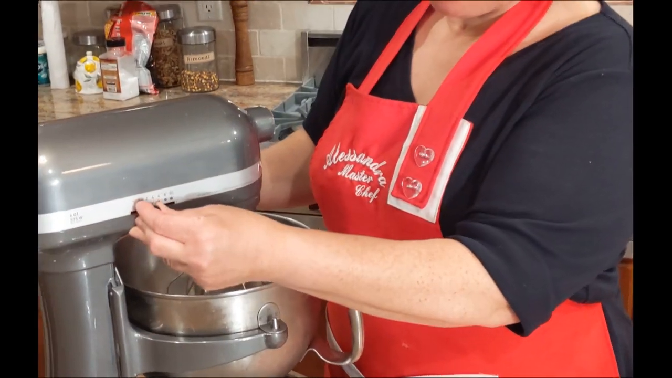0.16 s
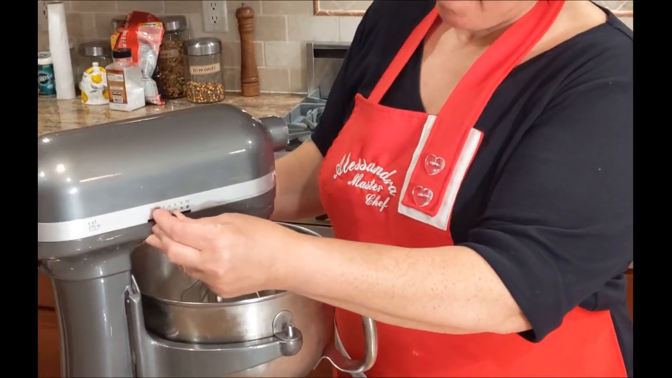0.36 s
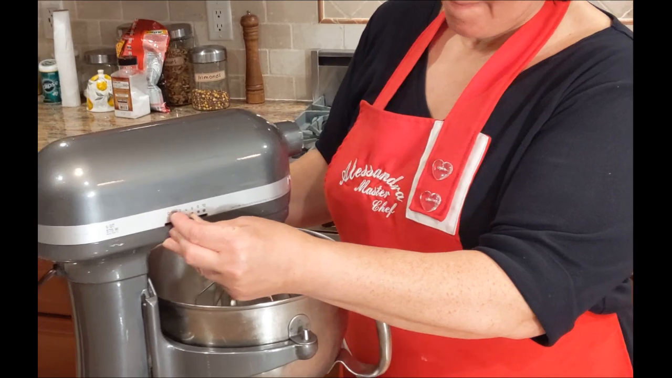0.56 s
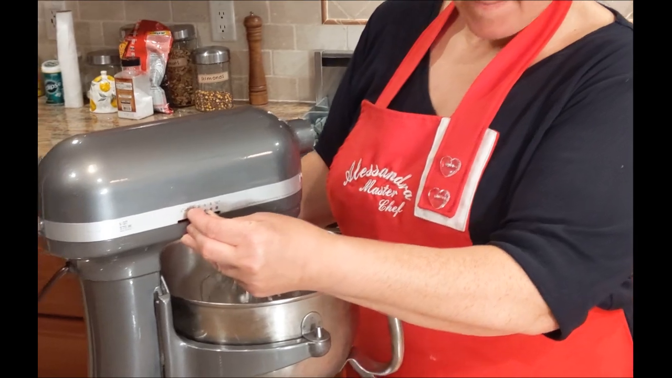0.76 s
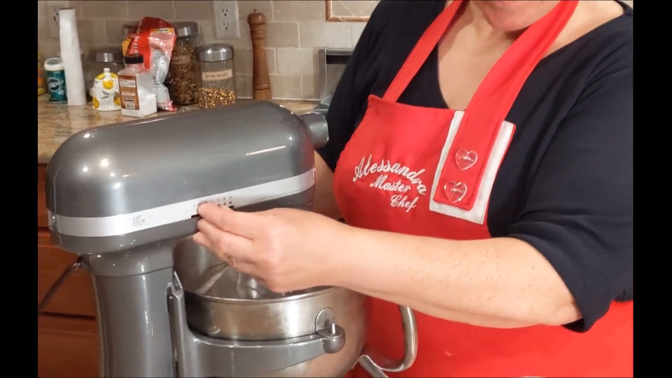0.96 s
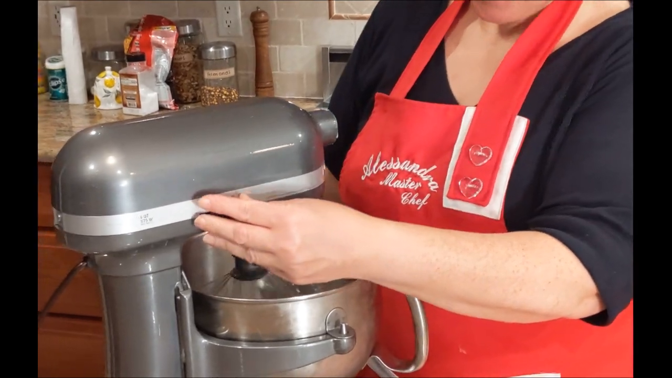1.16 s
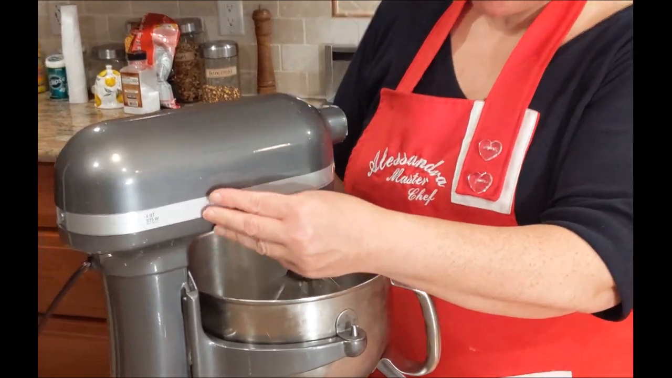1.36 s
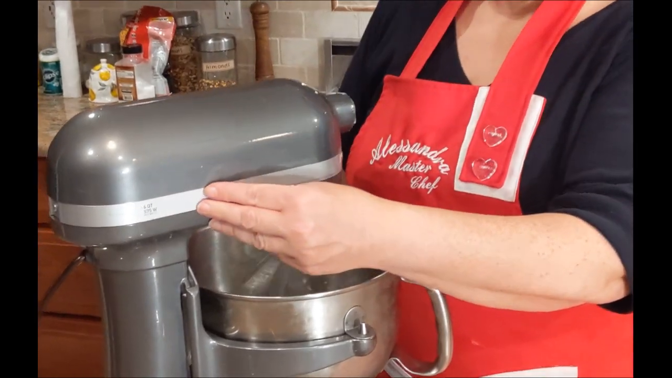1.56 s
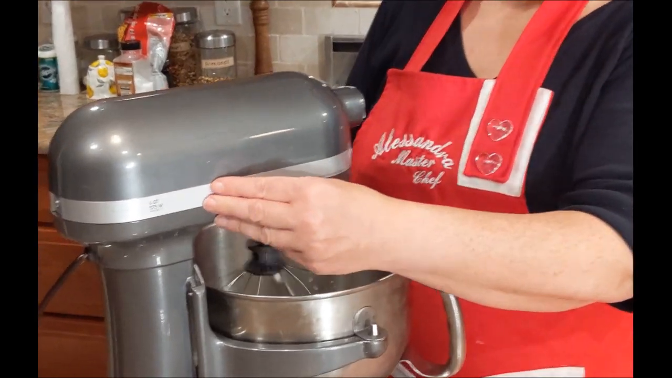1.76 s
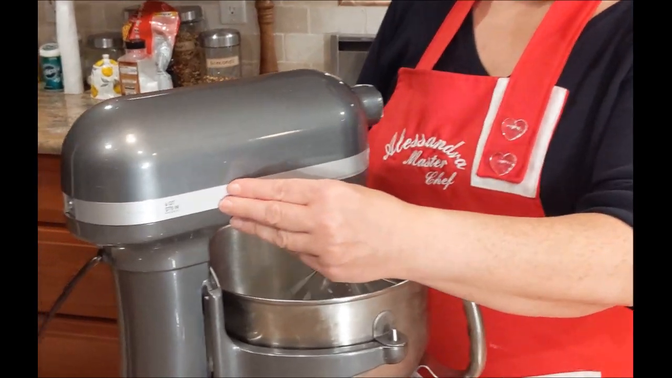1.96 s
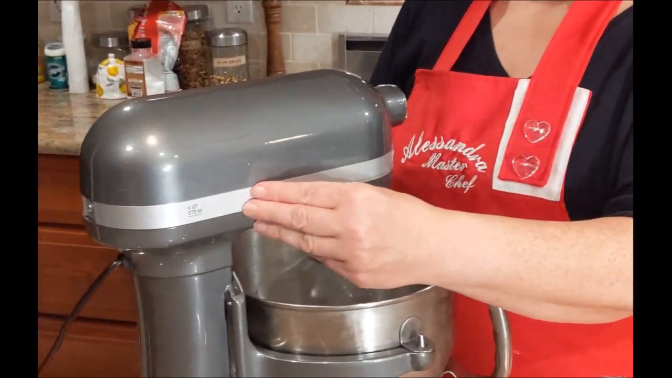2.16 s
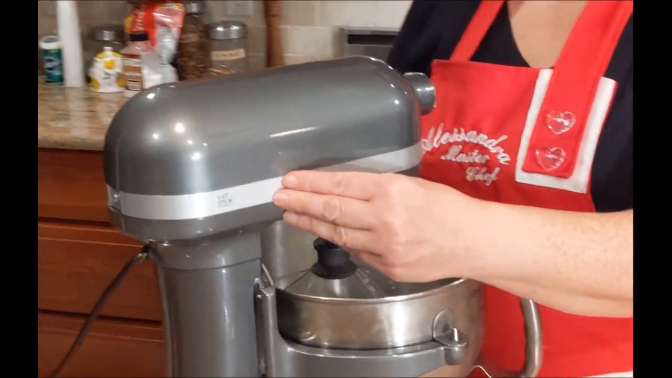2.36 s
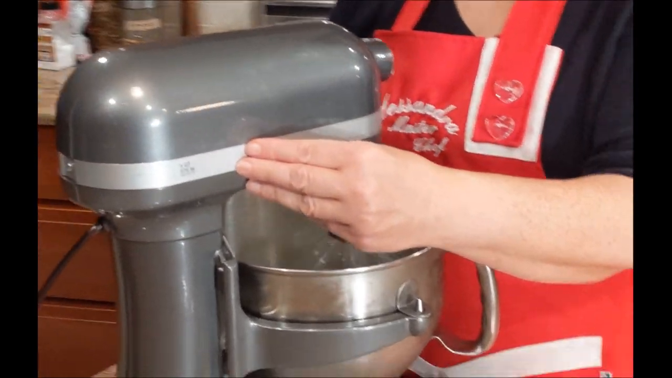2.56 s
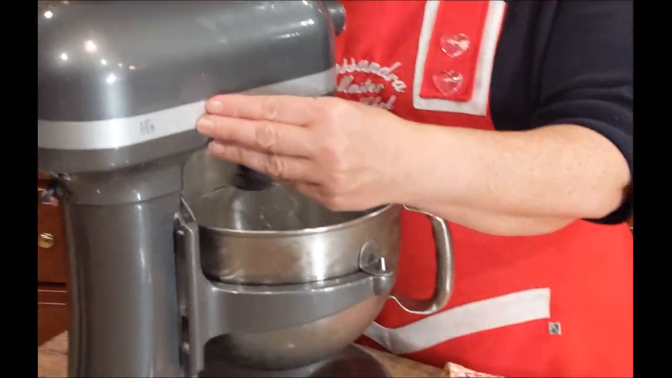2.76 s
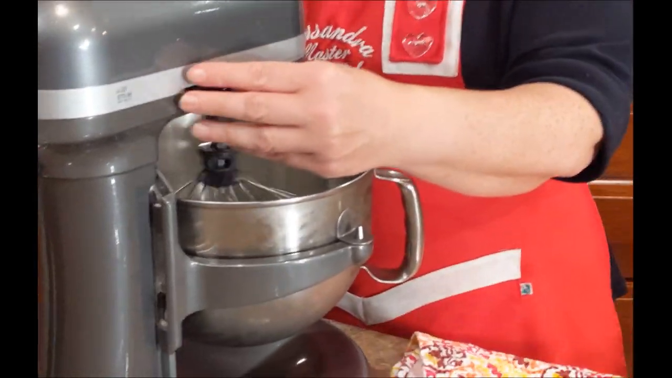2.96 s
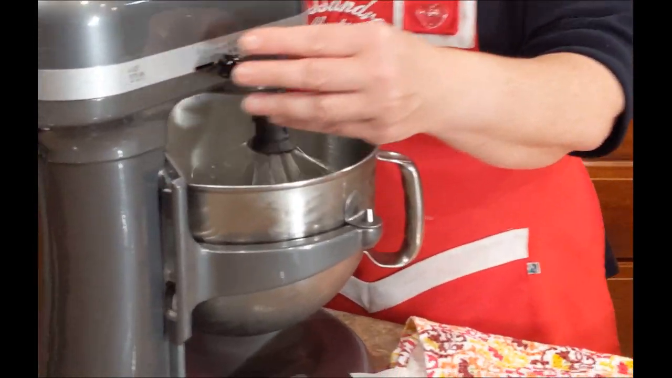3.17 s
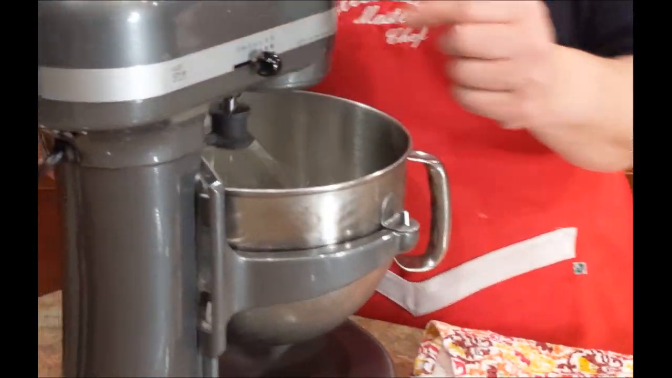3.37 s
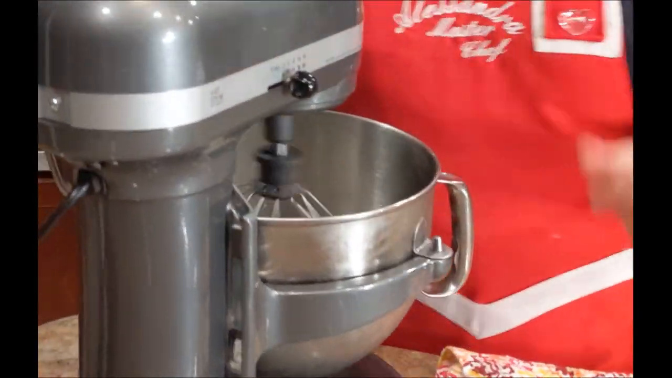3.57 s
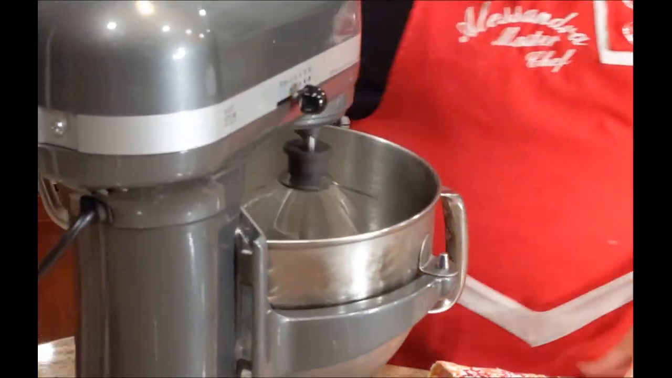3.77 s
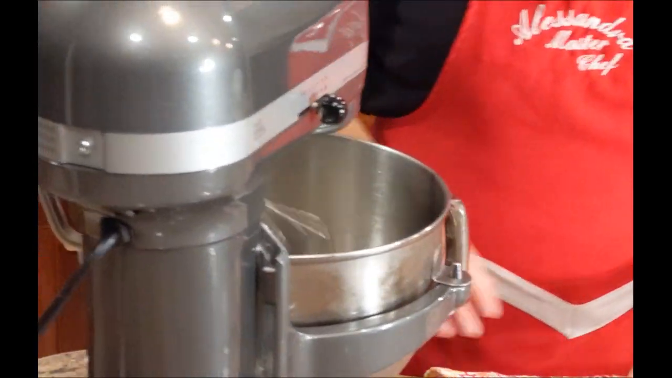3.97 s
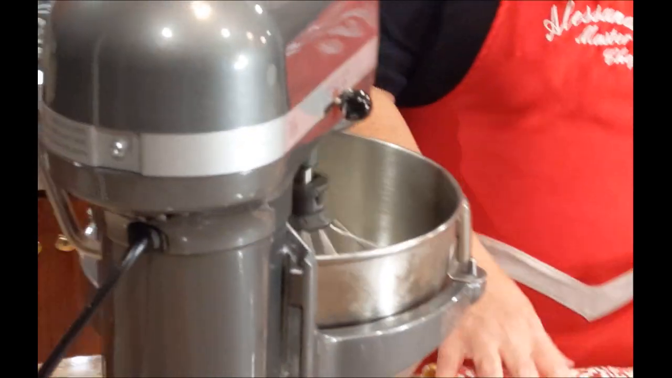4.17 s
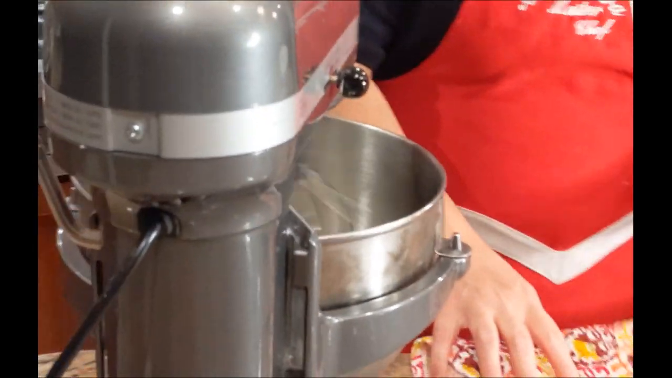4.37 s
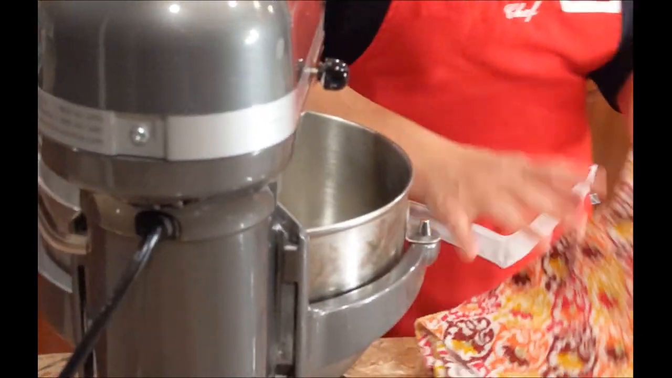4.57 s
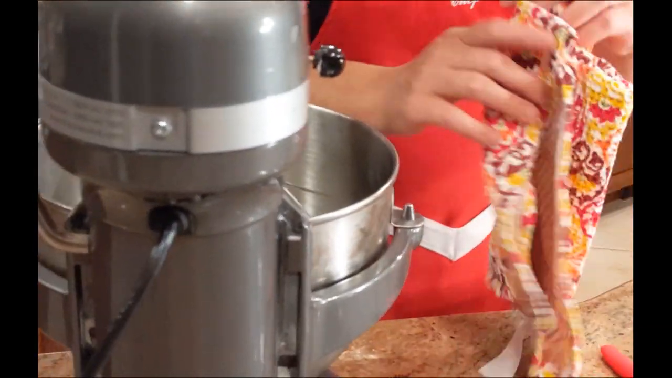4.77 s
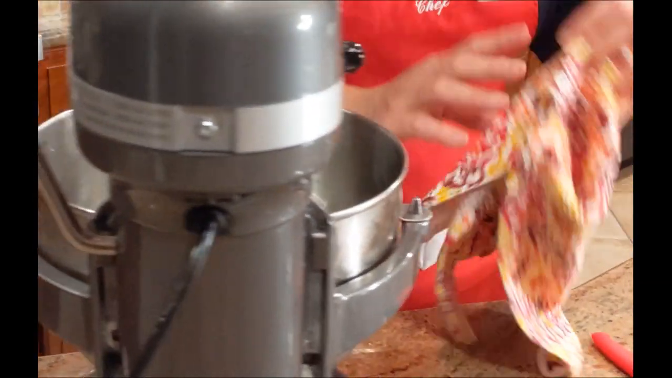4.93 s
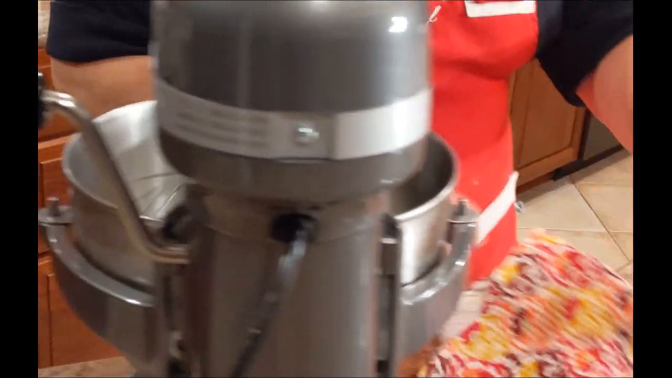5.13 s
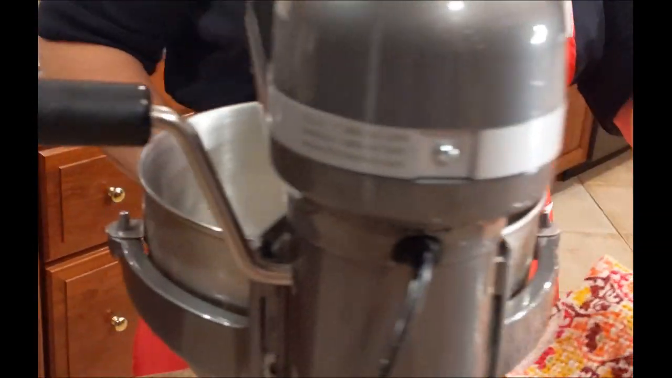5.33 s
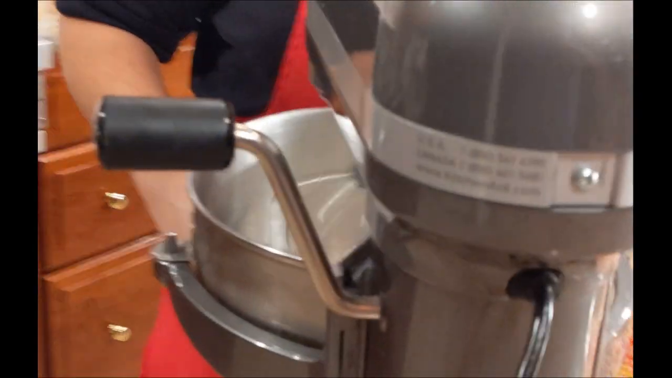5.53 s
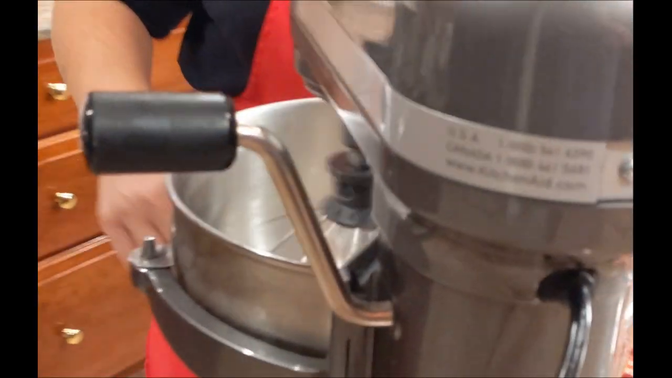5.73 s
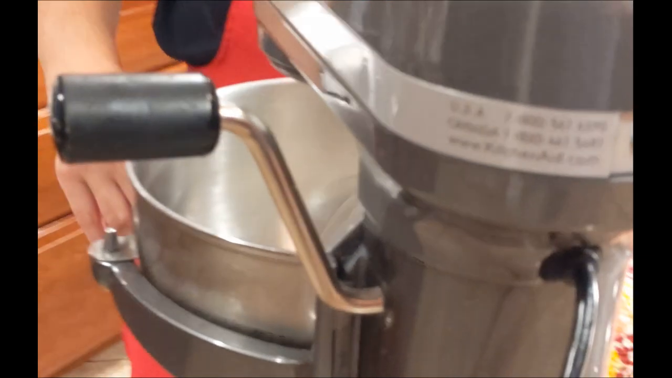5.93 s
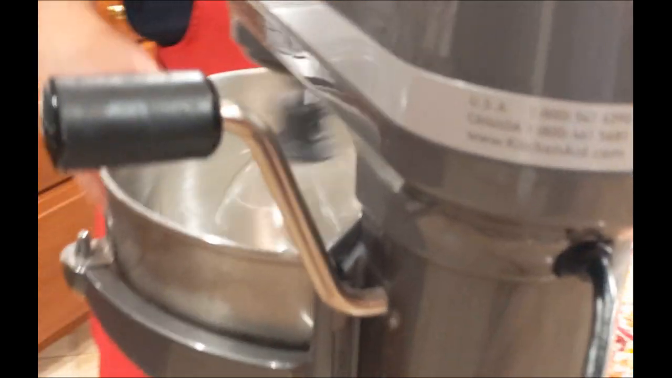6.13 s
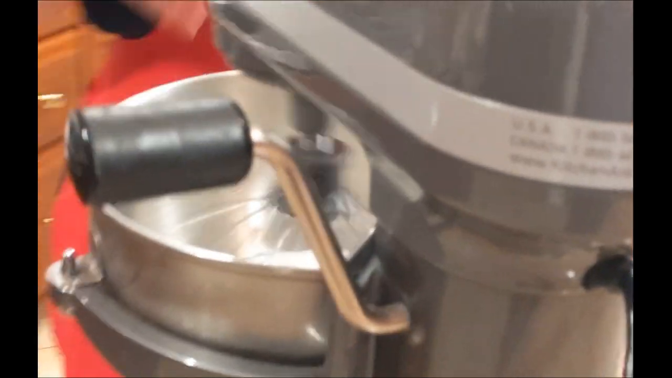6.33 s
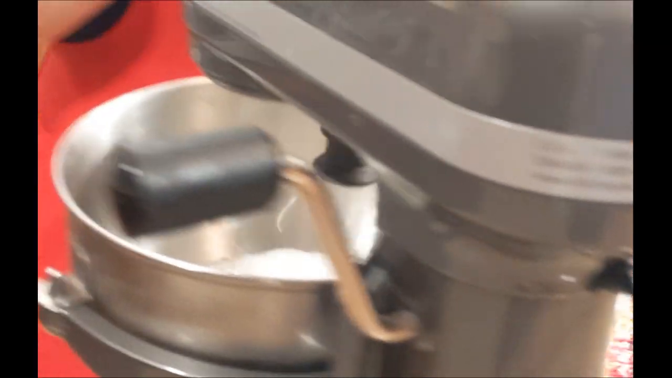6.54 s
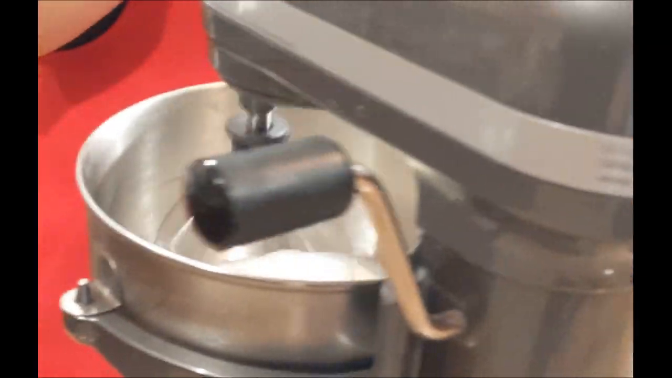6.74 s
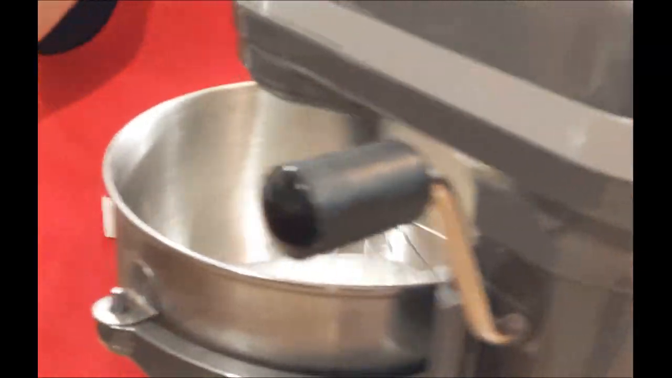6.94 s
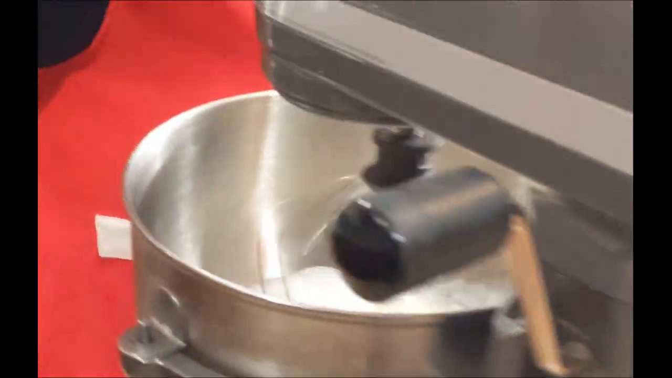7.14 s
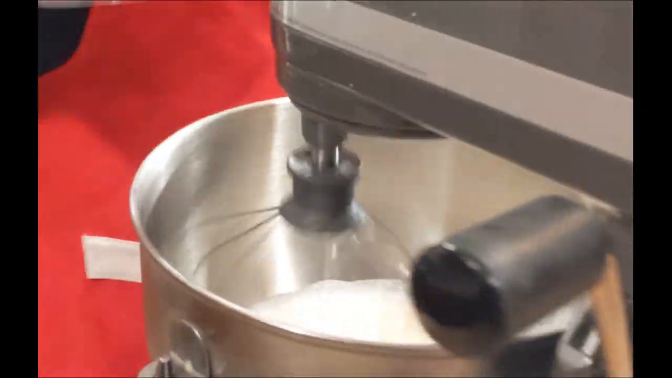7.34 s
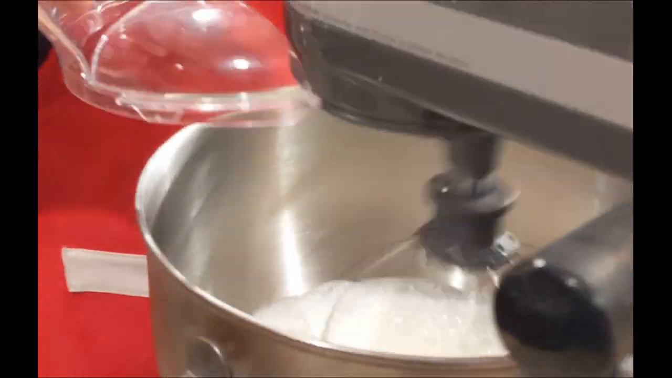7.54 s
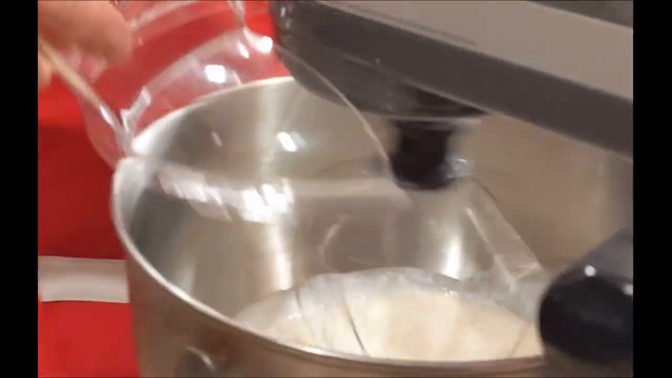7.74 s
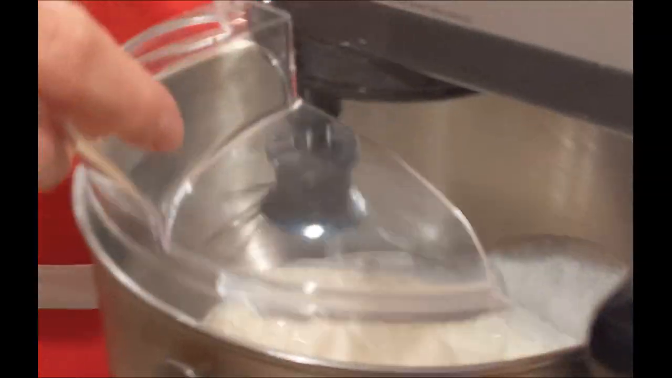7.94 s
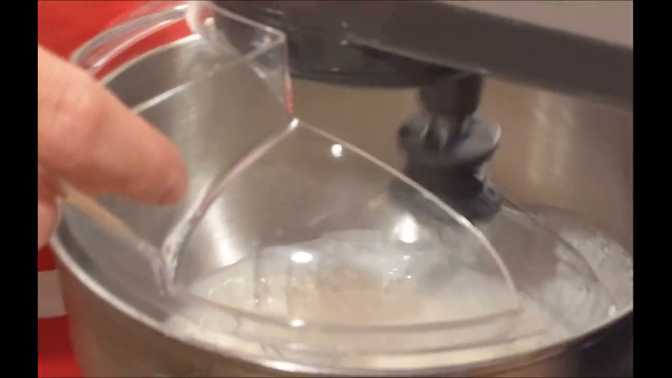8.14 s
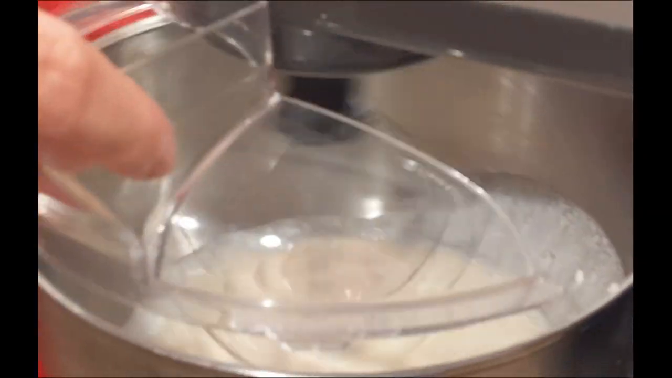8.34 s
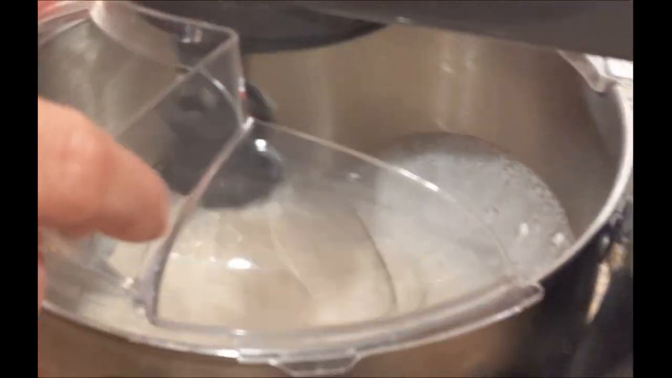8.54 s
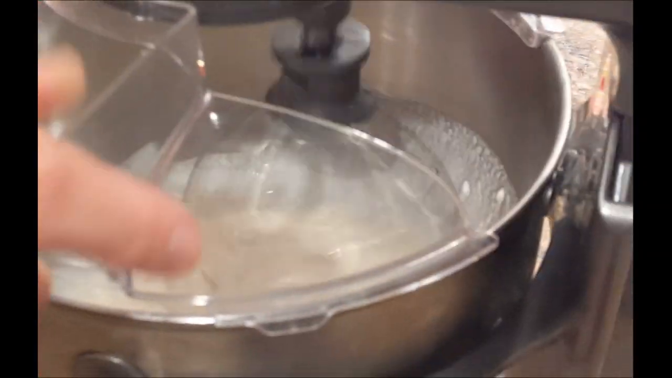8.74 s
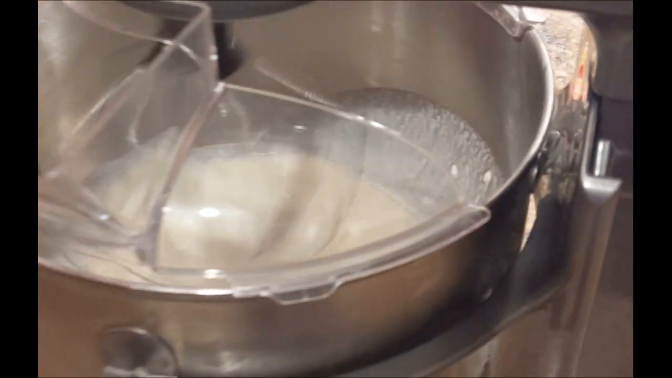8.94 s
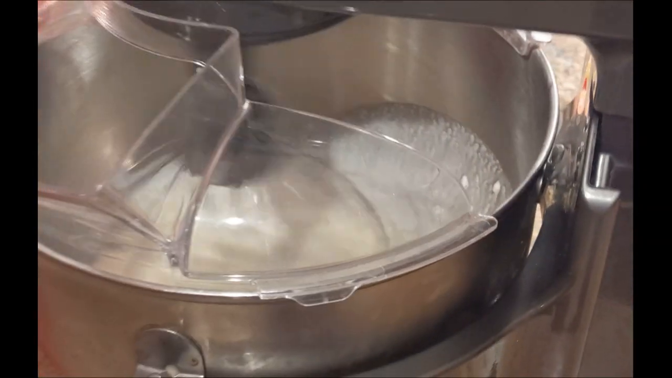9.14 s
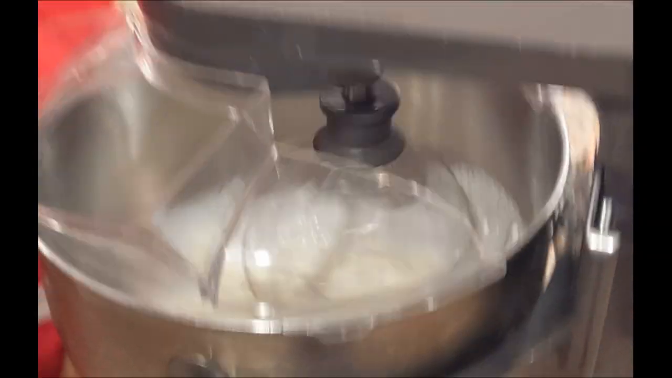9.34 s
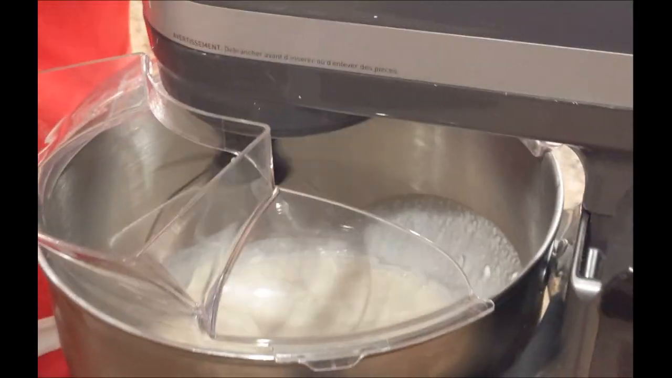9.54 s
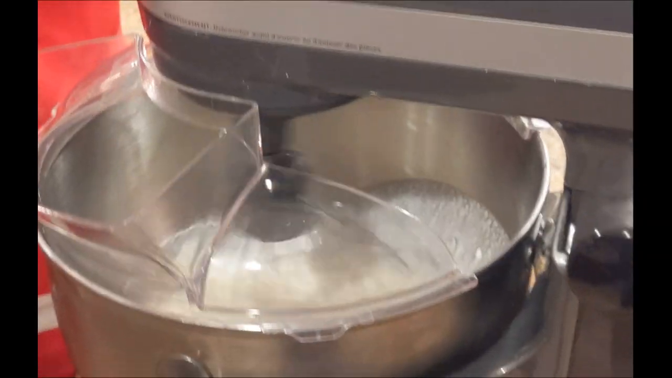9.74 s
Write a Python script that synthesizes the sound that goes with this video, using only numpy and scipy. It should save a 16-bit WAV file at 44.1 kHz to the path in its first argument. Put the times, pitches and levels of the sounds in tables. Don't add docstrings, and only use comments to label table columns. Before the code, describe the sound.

A quiet indoor kitchen with dull room air and a faint refrigerator hum; a tiny touch at 0.04 s, then soft lever clicks near 0.5 and 0.6 s. A stand mixer groans into laboured motion, with a low notch click at 0.77 s and wavering rising whines. Another click near 1.2 s accompanies a quick climb to whipping speed. From about 1.5 s it runs steadily: rumble, gear grind, hum, piercing rotor whine and airy brush hiss. The hand-held stereo microphone circles closer, loudest around 6 to 8 s, so tones swell and fade. Small ticks sound near 4, 5.1 and 7.3 s. At 7.75-7.9 s a plastic guard lands and rattles on the steel rim, ringing briefly; harder knocks follow at 8.2 and 8.4 s with a bowl shudder, then light ticks up to 9.4 s. Around 9.7 s the motor pitch jumps higher until the end.

```python
import sys
import numpy as np
from scipy import signal
from scipy.fft import rfft, irfft, next_fast_len
from scipy.io import wavfile

SR = 44100
rng = np.random.default_rng(int(sys.argv[2]) if len(sys.argv) > 2 else 0)


def file_out(sig):
    cols = np.atleast_2d(sig).T
    lim = np.clip(cols, -1, 1)
    pcm = np.round(lim * 32767).astype(np.int16)
    wavfile.write(sys.argv[1], SR, pcm)


def boost(x):
    u = np.asarray(x, float) / 20
    return 10 ** u


N = 432180

HUM, MESH = 1.2827, 5.0
# pitch [Hz], left over right [dB].
PORT_BALANCE = [(60, 1.5), (380, 0), (700, 1), (1290, -6), (2380, 4.5), (4400, 0), (7000, 5.5), (9500, -3),
                (11500, -13), (15000, -19)]
# time [s], level under full running [dB].
EFFORT = [(.54, -38.5), (.65, -24), (.75, -13), (.94, -6.5), (1.04, -8), (1.17, -2), (1.35, 1), (1.6, 1)]
# time [s], nearness [dB].
NEARNESS = [(1.6, -1), (2.2, -1), (3.15, 0.5), (4.2, 4), (4.6, 3.5), (5.25, 4), (5.8, 7), (6.4, 5.5),
            (7.4, 6.5), (8.2, 6.5), (8.8, 4.5), (9.4, 2.5), (9.7, 3), (9.8, 4)]


def in_time(rows, before=None):
    s, *columns = np.transpose(rows)
    return [np.interp(np.arange(N) / SR, s, c, left=before) for c in columns]


def at_hz(points, hz):
    table_hz, values = np.transpose(points)
    return np.interp(np.log(hz), np.log(table_hz + 1), values)


def rms_one(x):
    return x / np.sqrt(np.mean(x ** 2) + 1e-20)


def drift(rate):
    r = np.exp(-128 * np.pi * rate / SR)
    slow = signal.lfilter([1], [1, -2 * r, r * r], rng.standard_normal(N // 64 + 2002))[2000:]
    return np.interp(np.arange(N) / 64, np.arange(len(slow)), rms_one(slow - slow.mean()))


def swells(rows):
    t = np.arange(N) / SR
    return sum(db * np.exp(-((t - s) / half) ** 2) for s, db, half in rows)


def ring(x, hz, t60):
    r, w = boost(-60 / (t60 * SR)), 2 * np.pi * hz / SR
    return signal.lfilter([0, np.sin(w)], [1, -2 * r * np.cos(w), r * r], x + 1e-18)


def resonance(x, hz, width):
    r = np.exp(-np.pi * width / SR)
    poles = [1, -2 * r * np.cos(2 * np.pi * hz / SR), r * r]
    return signal.lfilter(np.array([1, 0, -1]) * (1 - r * r) / 2, poles, x)


def bands():
    # pitch [Hz], correlation [-1 to 1].
    likeness = [(60, 0.76), (130, 0.83), (290, 0.89), (640, 0.73), (1410, 0.31), (3100, -0.1),
                (6820, -0.09), (15000, -0.01)]
    # pitch [Hz], phase [rad].
    left_lead = [(0, 0), (780, 0.1), (2150, 1.6), (2410, 2.1), (3270, 0.7), (3620, 2.6), (4390, 3.4),
                 (4820, 9.6), (5510, 9.6), (6290, 16.5), (8700, 17.6), (10200, 29.6), (12700, 33.4),
                 (15500, 36.3)]
    edges = 25 * 2 ** (np.arange(29) / 2.99)
    white = rng.standard_normal((2, 2, N))
    for k, (low, high) in enumerate(zip(edges, edges[1:])):
        band = signal.butter(2, [low, high], "band", fs=SR, output="sos")
        near, other = signal.sosfilt(band, white[k % 2])
        hz = np.sqrt(low * high)
        lead = at_hz(left_lead, hz)
        alike = np.clip(at_hz(likeness, hz) / np.cos(min(lead, 1)), .25, 1)
        lag = round(lead / (2 * np.pi * hz) * SR)
        right = np.roll(alike * near + np.sqrt(1 - alike ** 2) * other, lag)
        yield hz, np.array([near, right]) * boost(at_hz(PORT_BALANCE, hz) / 2 * np.array([[1], [-1]]))


def room_tone():
    # pitch [Hz], density [dB per Hz].
    room_colour = [(15, -41), (25, -8), (53, -3), (91, -9.5), (123, -10.5), (144, -8.5), (262, -12.5),
                   (513, -16), (955, -22.5), (15800, -41.5)]
    return boost(-56.5) * rms_one(sum(pair * boost(at_hz(room_colour, hz)) for hz, pair in bands()))


def refrigerator():
    # pitch [Hz], level [dB].
    mains = [(59.2, -84.5), (118.4, -62.5)]
    t = np.arange(N) / SR
    return sum(boost(db + 1.5 + 2.0 * drift(1.09)) * np.sin(2 * np.pi * hz * t) for hz, db in mains)


def kitchen(x):
    size = next_fast_len(N + SR)
    hz, spectrum = np.arange(size // 2 + 1) * SR / size, rfft(x, size)
    t60 = 0.314 / (1 + hz / 6000)
    sides = []
    for lags in rng.uniform(.009, .03, (2, 6)):
        loops = [boost(-60 * d / t60) * np.exp(-2j * np.pi * hz * d) for d in lags]
        echoes = sum((-1) ** k * g / (1 - g) for k, g in enumerate(loops))
        sides.append(irfft(spectrum * echoes, size)[:N])
    return np.array(sides)


def knock_rows():
    # time [s], peak [dB], brightest pitch [Hz].
    lever = [
        (.039, -44, 820),
        (.462, -58, 3000),
        (.474, -46.5, 980),
        (.59, -41, 7000),
        (.77, -33, 900),
        (1.165, -26, 5000),
    ]
    # time [s], peak [dB], brightest pitch [Hz].
    whisk = [
        (3.951, -27, 1500),
        (5.091, -31, 860),
        (7.259, -21.5, 1500),
        (8.77, -28, 2500),
        (8.94, -22, 3000),
        (9.38, -23.5, 2200),
    ]
    # time [s], peak [dB], brightest pitch [Hz], rattle [ms], ring share [0-1].
    guard = [
        (7.743, -21, 1410, 4., 0.38),
        (7.801, -12.5, 1291, 14, 0.27),
        (7.817, -15.5, 1450, 12, 0.2),
        (7.826, -13, 1200, 5, 0.63),
        (7.832, -17.5, 1900, 14, 0.86),
        (7.907, -19.5, 1490, 6.6, .4),
        (8.194, -9.5, 1160, 12, 0.75),
        (8.195, -10.5, 6000, 3.5, 0.01),
        (8.411, -10, 3100, 8.1, 0.04),
        (8.415, -7.5, 2040, 10.4, 0.47),
    ]
    return [(*row, 13, 0.54) for row in lever] + [(*row, 5.6, 0.37) for row in whisk] + guard


def knocks():
    # pitch [Hz], level [dB], t60 [s].
    rim = [(349.6, 14.5, 0.23), (514, 7, 0.12), (770, -33.5, 0.11), (973, -1.5, 0.29), (1200, -9.5, 0.14),
           (1421, -5, 0.145), (1640, -1, 0.49), (1900, -7, 0.19), (2112, 3.5, 0.084), (2190, -10.5, 0.35),
           (2440, -4.5, 0.054), (2900, 0, 0.058), (4050, -2, 0.029), (4670, 17, 0.059), (7000, -12, .02)]
    # time [s], level [dB].
    thuds = [
        (0.038, -51.5),
        (.77, -42.5),
        (5.459, -32),
        (7.8, -23),
        (7.825, -38),
        (8.195, -38.5),
        (8.411, -30),
    ]
    out, t = np.zeros(N), np.arange(SR // 3) / SR
    for s, peak_db, bright_hz, rattle_ms, share in knock_rows():
        draw, luck = rng.standard_normal((3, len(t))), rng.standard_normal((2, len(rim)))
        sparse = draw[0] * (abs(draw[1]) > 1.2)
        contacts = sparse * np.exp(-t / (rattle_ms / 1200)) * np.minimum(t / 0.00043, 1)
        rings = 0
        for (hz, db, t60), odd, shift in zip(rim, *luck):
            mode_db = db + 2 * odd - 7.3 * np.log2(hz / bright_hz) ** 2
            rings = rings + ring(contacts, hz * (1 + 0.015 * shift), t60 * share) * boost(mode_db)
        broad = signal.butter(2, [bright_hz / 2.58, bright_hz * 2.31], "band", fs=SR, output="sos")
        clack = signal.sosfilt(broad, contacts)
        crack = .16 * draw[2] * np.exp(-t / .0035) * np.minimum(t / .0008, 1)
        hit = share * rings / abs(rings).max() + 1.2 * clack / abs(clack).max() + crack
        hit = signal.sosfilt(signal.butter(2, 250, "high", fs=SR, output="sos"), hit)
        at = round(s * SR)
        out[at:at + len(t)] += boost(peak_db) * hit[:N - at]
    for s, thud_db in thuds:
        at = round(s * SR)
        out[at:at + len(t)] += boost(thud_db) * np.sin(2 * np.pi * 130 * t) * np.exp(-t / 0.0044)
    return out


def low_step():
    # time [s], groan level [dB].
    groan_curve = [(.472, -47), (.52, -47), (.57, -48), (.7, -49.5), (.8, -45.5), (.95, -43), (1.1, -44.5),
                   (1.3, -47), (1.6, -61.5)]
    # pitch [Hz], width [Hz], level [dB].
    groan_modes = [(245, 12, -13), (429, 41, -2.5), (985, 150, -3.5), (1563, 144, -15), (2050, 46, -16.5),
                   (3790, 450, -14)]
    # start [s], end [s], start pitch [Hz], end pitch [Hz], level [dB].
    whines = [
        (.85, 1.16, 1000, 1040, -43),
        (.85, 1.05, 1490, 1570, -50),
        (.95, 1.05, 1850, 1890, -54),
        (.83, 1.05, 2900, 3150, -49),
        (.86, 1.04, 3520, 3720, -51),
        (.8, 1.11, 4060, 4370, -47.5),
        (.84, 1.03, 5200, 5350, -53),
        (.95, 1.07, 6850, 6950, -58),
        (1.1, 1.21, 3250, 4400, -46),
        (1.13, 1.24, 4350, 5650, -46.5),
    ]
    size = 2 * SR
    t, white, out = np.arange(size) / SR, rng.standard_normal(size), np.zeros(N)
    groan = 0
    for hz, width, db in groan_modes:
        mode = resonance(resonance(white, hz, width), hz, 2 * width)
        groan = groan + boost(db) * rms_one(mode)
    out[:size] = groan * boost(in_time(groan_curve, before=-120)[0][:size]) * (t < groan_curve[-1][0])
    for start, end, start_hz, end_hz, level_db in whines:
        along = np.clip((t - start) / (end - start), 0, 1)
        glide = start_hz + (end_hz - start_hz) * np.sin(along * np.pi / 2)
        pitch = glide + end_hz * 0.0033 * drift(17)[:size]
        level = boost(level_db + 3 + 2.5 * drift(12)[:size]) * np.sin(np.pi * along) ** .5
        out[:size] += level * np.sin(2 * np.pi * np.cumsum(pitch) / SR)
    return np.array([out, np.roll(out, 1)])


def shaft_speed():
    # time [s], new speed [turns per s], ramp [s], share that creeps in afterwards [0-1].
    lever_steps = [
        (.655, 88, .145, .15),
        (1.04, 200.7, .14, .35),
        (9.715, 255, .14, .35),
    ]
    t, speed, old = np.arange(N) / SR, np.zeros(N), 0
    for s, new, ramp_s, creep in lever_steps:
        since = np.maximum(t - s, 0)
        ramp = np.minimum(since / ramp_s, 1)
        settle = 1 - np.exp(-since / .15)
        speed += (new - old) * ((1 - creep) * ramp + creep * settle)
        old = new
    return speed


def noise_db():
    # full running [dB], share of effort, share of nearness.
    noise_layers = [
        (-44.5, .12, .3),
        (-37, 0.57, 0.51),
        (-39.5, 0.57, 0.58),
        (-40, 1.1, 1),
    ]
    # time [s], lift [dB], half-length [s].
    bowl_rumbles = [
        (2.96, 2.5, 0.26),
        (4.16, 4, 0.35),
        (7.85, 3, 0.24),
        (8.37, 13, 0.089),
    ]
    (effort,), (near,) = in_time(EFFORT), in_time(NEARNESS)
    switch_s, rise_s = 0.463, .07
    switch, = in_time([(switch_s, -15), (switch_s + rise_s, 0)], before=-82)
    layers = [full_db + a * effort + b * near + switch for full_db, a, b in noise_layers]
    layers[0] += swells(bowl_rumbles)
    return np.array(layers)


def housing(x):
    # pitch [Hz], width [Hz], level over the noise [dB].
    castings = [(244, 18, 7), (326, 104, 4), (437, 21.8, 8.5), (807, 100, 4.5), (1024, 24, 7),
                (1550, 150, 3.5), (2022.4, 76.3, 6), (3000, 25, -0.5), (3874, 126, 4.5), (4189, 82, 4),
                (5266, 226, 3), (10350, 920, 7.5), (13280, 447.4, 8)]
    for hz, width, lift_db in castings:
        x = x + (boost(lift_db) - 1) * resonance(x, hz, width)
    return x


def counter(x):
    treble = signal.sosfilt(signal.butter(2, 2500, "high", fs=SR, output="sos"), x)
    lag = SR * (.0004 + .00004 * drift(.2))
    mirrored = [np.interp(np.arange(N) - lag, np.arange(N), side) for side in treble]
    return x + .25 * np.array(mirrored)


def motor_noise(turns, patchy_db=1.5, flutter_db=2.0):
    zone_hz = [350, 1500, 4600, 11000]
    # pitch [Hz], density within the layers [dB per Hz].
    colour = [(100, -32), (200, -3.5), (450, -0.5), (570, -9.5), (750, 0.5), (1600, 0), (2600, 0.5),
              (3300, 0.5), (4700, 6), (5400, 3.5), (6400, -1), (9000, -1), (10800, -3), (14000, -4.5)]
    zone_trim = [(350, 9.44), (1500, 7.3), (4600, 4.75), (11000, 0.7)]   # (Hz, dB)
    zones, motor = boost(noise_db()), 0
    shared = drift(2.1)
    for hz, pair in bands():
        place = np.interp(np.log(hz), np.log(zone_hz), np.arange(4))
        k = min(int(place), 2)
        level = zones[k] * (k + 1 - place) + zones[k + 1] * (place - k)
        per_hz = at_hz(colour, hz) + at_hz(zone_trim, hz)
        flutter = flutter_db * (.2 * shared + drift(11)) / 2
        motor = motor + pair * level * boost(per_hz + patchy_db * drift(0.6) + flutter)
    beat = 1 + .05 * (np.cos(turns) + np.cos(turns / 2)) + .02 * np.cos(HUM * turns)
    return counter(housing(motor * beat))


def tone_db():
    # time [s], level [dB].
    mesh_heard = [(.9, -47.5), (1.14, -51.5), (1.4, -46.5), (1.75, -37.5), (2.0, -42), (3.0, -35),
                  (3.5, -40), (3.75, -53), (4.6, -41), (5.0, -54.5), (5.3, -42.5), (6.0, -48.5), (6.8, -43),
                  (7.15, -48.5), (7.5, -41), (8.0, -33), (9.72, -33.5), (9.8, -38)]
    # time [s], lift
    # [dB], half-length [s].
    mesh_swells = [
        (.82, 12.5, 0.022),
        (1.24, 9, 0.0622),
        (7.26, 11.5, 0.15),
    ]
    # time [s], lift [dB], half-length [s].
    swells18 = [(.95, -4.5, 0.085), (1.4, -1, .1), (2.1, 9.5, 0.17), (2.55, 3, 0.105), (4.65, -3, 0.254),
                (5.2, 8.5, 0.13), (6.1, 2.5, .4), (8.62, 7.5, .45), (9.45, 3, 0.22)]
    # time [s], lift [dB], half-length [s].
    swells24 = [(1.36, -10, 0.052), (1.55, 6, 0.47), (2.5, 4, 0.182), (3.15, 7.5, 0.14), (4.0, -1, 0.16),
                (4.5, 2.5, 0.13), (5.05, 3.5, 0.22), (6.55, 8, 0.34), (7.35, 4, 0.28), (8.1, 12.5, 0.567),
                (9.35, 6, 0.63)]
    (effort,), (near,), speed = in_time(EFFORT), in_time(NEARNESS), shaft_speed()
    blur = 0.6 * np.gradient(speed) * SR / 100
    guard_on_s, seat_s = 7.45, 1
    guard, = in_time([(guard_on_s, 0), (guard_on_s + seat_s, 11.5)])
    hum = -54 + 1.86 * effort - 0.444 * near + guard - 0.71 * blur
    mesh = in_time(mesh_heard)[0] + swells(mesh_swells)
    order18 = -49 + 0.77 * effort + swells(swells18) - blur
    order24 = -47.5 + 2.7 * effort + swells(swells24) - 0.67 * blur
    return np.array([hum, mesh, order18, order24]) - 120 * (speed < 60)


def tone(turns, multiple, level, fade_db, rough):
    hz = multiple * 200
    phase = multiple * turns + rough * drift(13.5)
    apart = min(hz / 1300, 1.4) * (1 + .4 * drift(.5))
    left = boost(at_hz(PORT_BALANCE, hz) + min(hz / 800, 3) * drift(.6))
    centre = np.maximum(abs(left + np.exp(1j * apart)) / 2, .5)
    fading = boost(fade_db * drift(.9) + min(hz / 1000, 2.3) * drift(10))
    wave = np.sqrt(2) * level * fading / centre
    return wave * [left * np.sin(phase), np.sin(phase - apart)]


def tones(turns):
    weak_orders = [2 * HUM, 3 * HUM, 4 * HUM, MESH + HUM, MESH + 2 * HUM, 9.92, 11.4, 12, 14.5, 30, 36, 42,
                   48, 54, 60, 66]
    weak_db = [-66.5, -54.5, -51.5, -49.5, -50.5, -53.5, -57, -55.5, -58, -54.5, -56, -54, -51, -54, -63,
               -59.5]
    # time [s], lift [dB], half-length [s].
    weak_swells = [(6.7, 12.5, 3), (9.01, 3.5, 0.78), (7.5, -10.5, 0.71), (2.5, -17, 0.92),
                   (7.47, 3.5, 0.79), (6.2, -4.5, 0.92), (5., 1, 1.07), (8.55, -15, 1.3), (6.9, 3, 1.),
                   (8.6, 0, 0.48), (8.9, 10.5, 1.116), (9.02, 13.5, 0.9), (8.74, -19, 0.68),
                   (6.37, 9.5, 1.4), (5.6, 6, .7), (5., -2, 1.)]
    # time [s], level [dB].
    spin_up = [(1.06, -10), (1.12, 4.5), (1.17, -4.5), (1.23, 3), (1.32, -0.5), (9.8, 4.5)]
    hum, mesh, order18, order24 = boost(tone_db())
    out = tone(turns, HUM, hum, .5, .2) + tone(turns, MESH, mesh, .5, .15)
    out += tone(turns, 18, order18, .5, .4) + tone(turns, 24, order24, .5, .4)
    strain_db, = in_time(spin_up, before=-120)
    fine_db = noise_db()[3] + 37 - abs(strain_db)
    for multiple, level_db, swell in zip(weak_orders, weak_db, weak_swells):
        strained = strain_db if multiple <= 30 else fine_db
        level = boost(strained + level_db + swells([swell]))
        out += tone(turns, multiple, level, 1.5, .1 + multiple / 70)
    return out


def scene():
    speed = shaft_speed() + .2 * drift(1.5)
    turns = 2 * np.pi * np.cumsum(speed + .11 * drift(9)) / SR
    hits = knocks()
    pair = np.array([hits, np.roll(hits, 1)]) * boost([[-.5], [.5]])
    background = room_tone() + refrigerator()
    contacts = pair + boost(-15.5) * kitchen(hits)
    return background + contacts + low_step() + motor_noise(turns) + tones(turns)


def band_limit(x):
    return signal.sosfilt(signal.butter(12, 15900, fs=SR, output="sos"), x)


def record(dry):
    rounded = .8 * np.tanh(dry / .8)
    cut = signal.sosfilt(signal.ellip(12, .5, 70, 15740, fs=SR, output="sos"), rounded)
    return band_limit(cut)


dry = scene()
out = record(dry)
file_out(out)
```